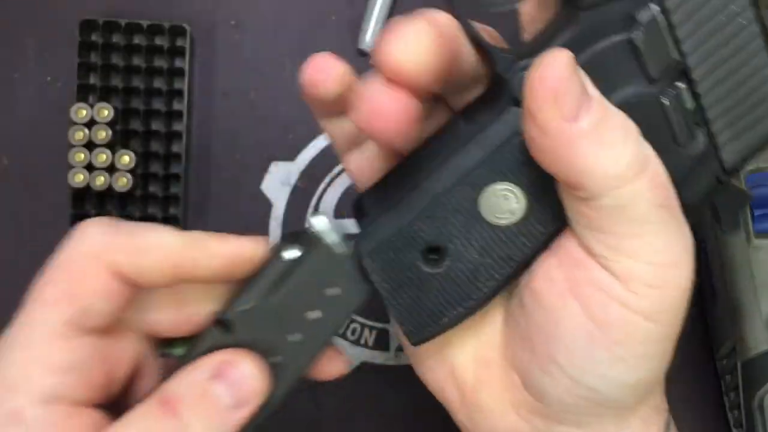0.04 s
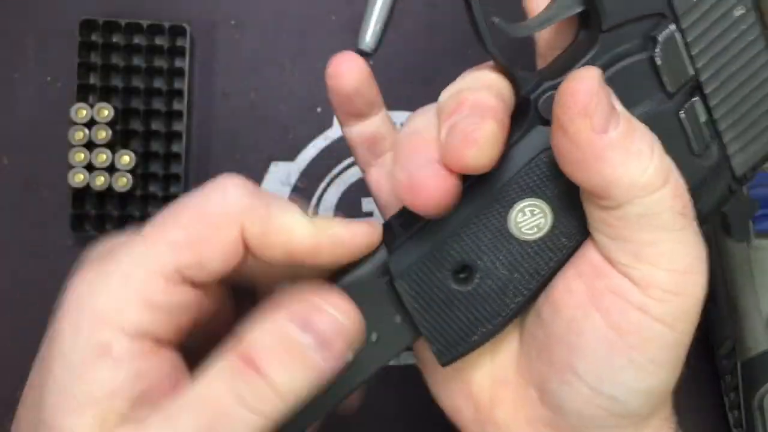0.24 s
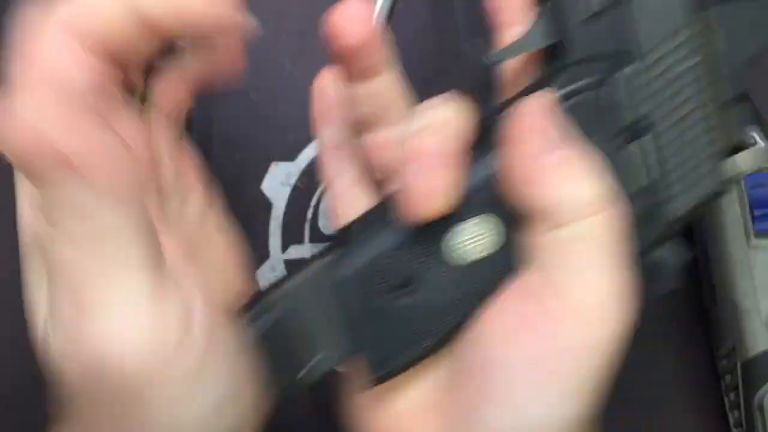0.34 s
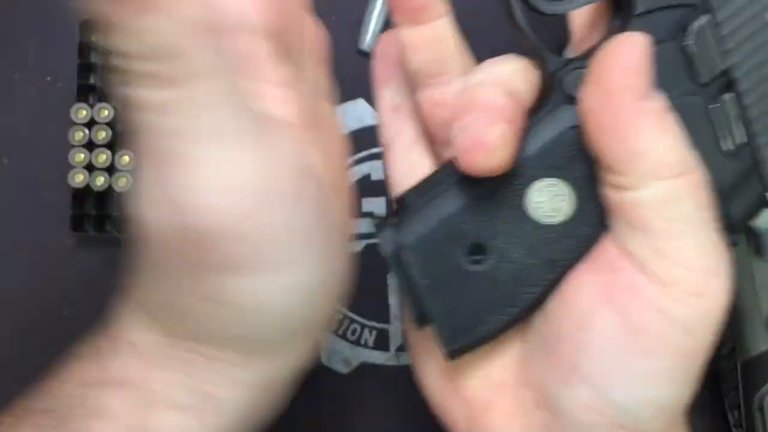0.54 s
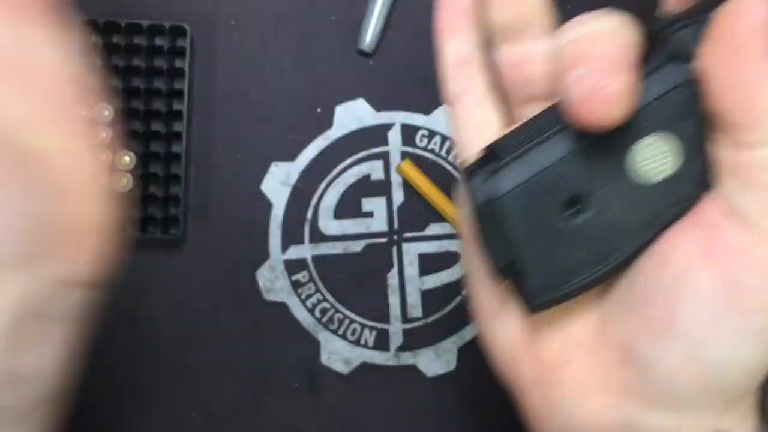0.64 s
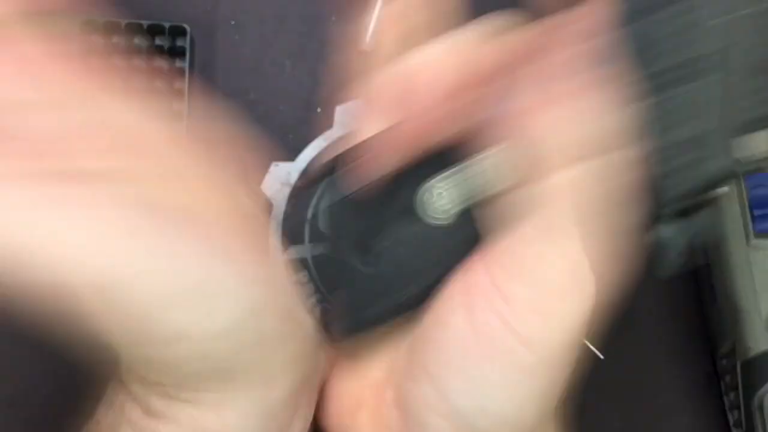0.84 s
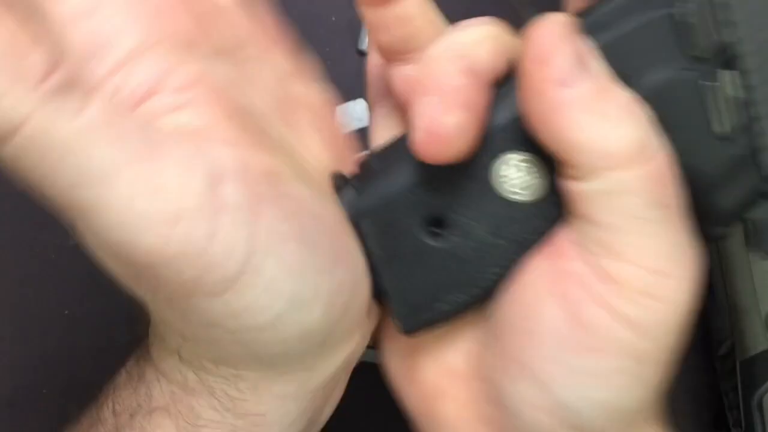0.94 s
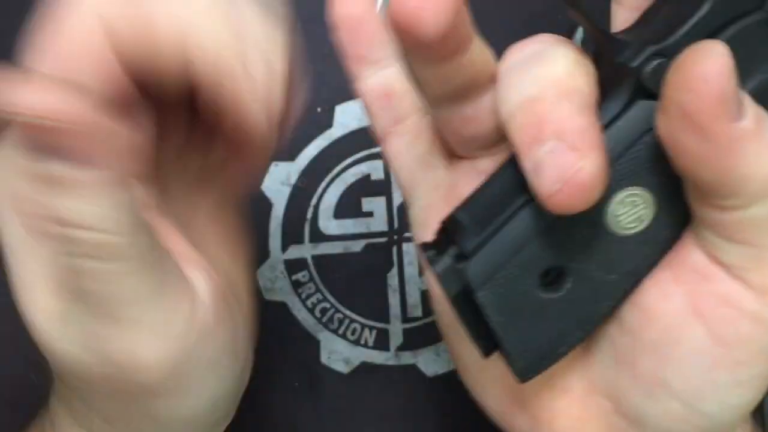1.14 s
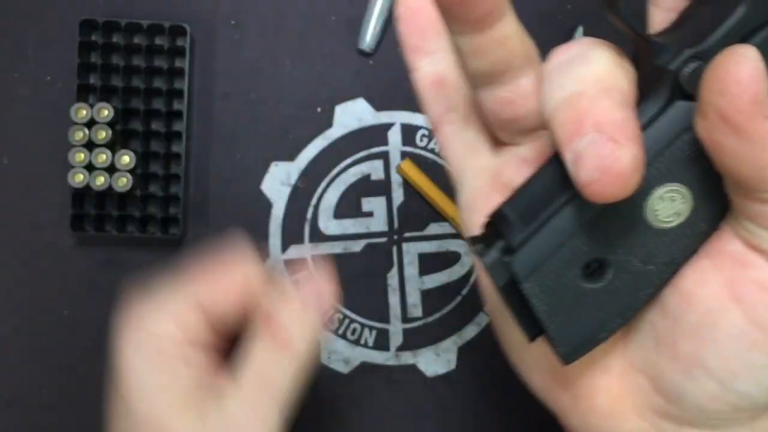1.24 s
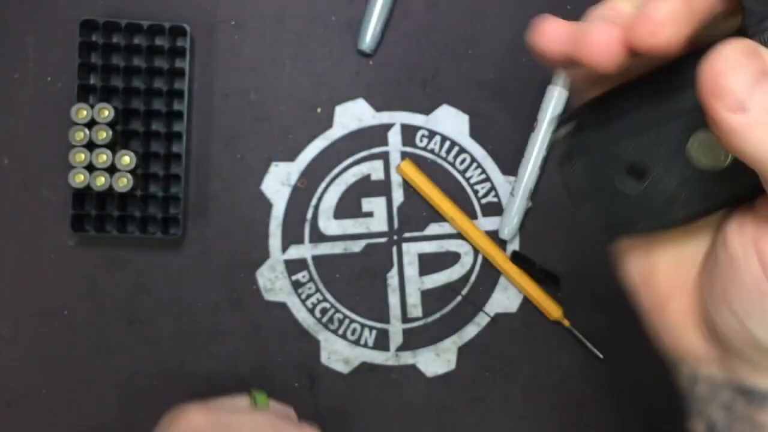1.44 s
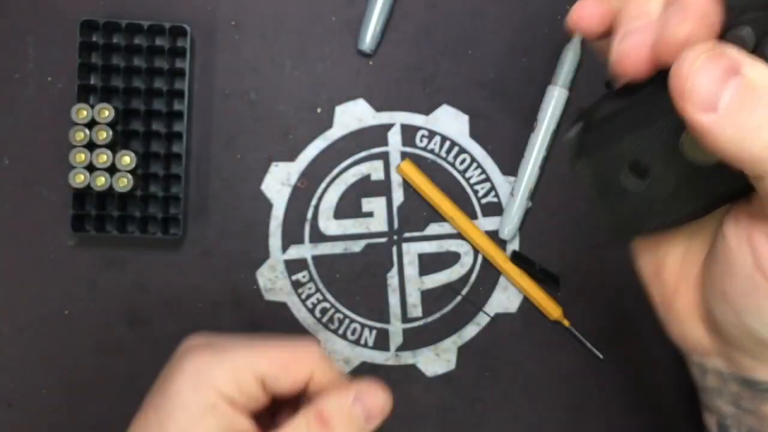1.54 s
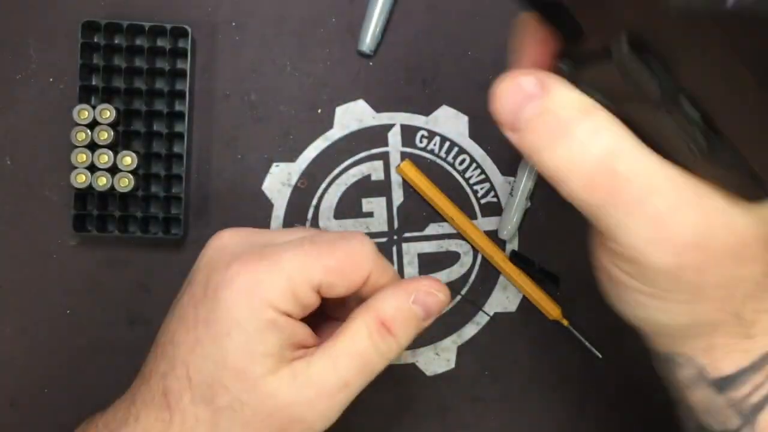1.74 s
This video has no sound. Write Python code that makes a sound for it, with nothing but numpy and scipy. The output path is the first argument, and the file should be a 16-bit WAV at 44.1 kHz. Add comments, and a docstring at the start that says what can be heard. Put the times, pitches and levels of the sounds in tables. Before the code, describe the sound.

A steel magazine clacks into a pistol grip at about 0.2 seconds, scrapes upward and locks at 0.5 seconds with a sharp click, palm thud and thin spring ping. Near 1 second a harder palm slap and metallic click briefly overload the close microphone. Soft workbench bumps and hand rubbing follow until 1.5 seconds, and one faint click comes at 1.8 seconds over quiet room tone.

```python
"""A loaded steel magazine is fed into a pistol, close to the microphone, above a workbench in a small room.
Over faint room tone it clacks against the mouth of the hollow grip, steel ringing, then scrapes up the
well, squeaks, and is driven home with a palm thud and a spring ping. A grip panel knocks softly.
The palm slaps the magazine once more, hard enough to overload the microphone, and it clicks back.
Afterwards the hands bump the bench softly and rub on grip and mat; one faint steel click comes last."""
import sys
import numpy as np
from scipy import signal
from scipy.fft import rfft, irfft
from scipy.io import wavfile

SR = 44100
rng = np.random.default_rng(int(sys.argv[2]) if len(sys.argv) > 2 else 0)


def transcribe(u):
    """Save the signal u as a 16-bit wav file named by the first command-line argument.

    u: samples, shape (n,) or (channels, n), limited to [-1, 1]; the rate is SR.
    q: integer samples, one column per channel.
    """
    v = np.clip(np.atleast_2d(u).T, -1, 1)
    q = np.round(v * 32767).astype(np.int16)
    wavfile.write(sys.argv[1], SR, q)


N = 79380

# hiss of the quiet room: (frequency [Hz], relative density [dB])
HISS_SPECTRUM = [(25, -12), (60, -3), (150, -4), (300, -8), (600, -18), (1200, -20), (3000, -22),
                 (6000, -26), (16000, -34)]
# steel meets steel: (time [s], level [dB], crush length [s], t60 [s], tilt [dB/octave],
# ring of the hollow grip [dB], low body [dB])
STEEL_CONTACTS = [(0.085, -56.5, 0.013, 0.17, 2.5, -21, 11.5), (0.225, -26, 0.0031, 0.022, 0, -21.5, -9),
                  (0.2389, -4.5, 0.0011, 0.024, -1.8, -7.5, -8.5),
                  (0.254, -30, 0.0074, 0.049, -1, 0.5, -4.5), (0.2917, -7.5, 0.00044, 0.011, -2, -3.5, -4),
                  (0.3101, -15, 0.0014, 0.019, -2.5, -11, 3), (0.3176, -17, 0.0022, 0.017, 0.5, -14, 4),
                  (0.3855, -30, 0.0053, 0.034, -3.5, -5.5, 9), (0.4086, -28, 0.0013, 0.045, 3, -12.5, -0.5),
                  (0.429, -18.5, .003, .016, 0.5, -11, 4), (0.441, -26.5, 0.0017, 0.022, -1, -6.5, 0.5),
                  (0.467, -15, 0.0014, .035, -0.5, -8.5, -4.5),
                  (0.4825, -10.5, 0.0051, 0.025, -2, -6.5, -1), (0.4866, -3.5, 0.0045, 0.018, 3, -18, -1.5),
                  (.4900, 3, 0.0045, 0.009, 0, -17, -1), (0.4963, -4.5, 0.0022, 0.027, 3, -12.5, 0.5),
                  (0.952, -39, 0.00084, .014, 2.5, -20.5, -4.5), (0.9697, -15, .001, 0.018, 6, -17, 3.5),
                  (0.9725, 1, 0.0013, 0.018, 1, -5.5, 7), (0.979, -0.5, 0.00088, 0.022, 1.1, -19.5, -4.5),
                  (1.0061, -8, 0.00069, 0.016, 1.5, -14.5, 9.5), (1.072, -31.5, 0.0016, 0.016, 4.5, -27, 0),
                  (1.7972, -29, 0.0036, 0.038, -4, -14, -6.5)]
# the crack of a contact: (frequency [Hz], relative density [dB])
CRACK_SPECTRUM = [(60, -35), (160, -26.5), (330, -12), (700, -18.5), (1100, 0), (2000, -0.5), (2800, 0.5),
                  (5500, -1.5), (7800, -8.5), (9200, -5.5), (10400, -17), (12500, -9), (16000, -22.5)]
# how far up a contact's low body reaches: (frequency [Hz], share [0-1])
BODY_REACH = [(650, 1), (1100, 0.047)]
# modes of frame and magazine: (frequency [Hz], level [dB], t60 [s])
STEEL_MODES = [(1322, -8, .07), (1490, -14, .05), (2150, -14, .06), (2347, -11, .08), (2630, -11, .08),
               (2862, -13, .09), (3250, -14, .07), (3462, -16, .07), (3557, -12, .06), (3970, -15, .05),
               (4078, -15, .08), (4526, -12, .08), (5222, -14, .09), (5355, -15, .05), (6200, -15, .03),
               (8930, -16, .04)]
# pitch of the hollow grip as the magazine goes in: (time [s], pitch [Hz])
WELL_PITCH = [(.24, 1130), (.3, 1030), (.455, 1000), (.49, 1116)]
# the room's answer against the close sound: (frequency [Hz], level [dB])
REVERB_LEVELS = [(150, -22), (350, -19), (600, -22.5), (1300, -22), (2600, -22.5), (4500, -21), (8500, -25),
                 (15000, -24.5)]
# how long the room rings: (frequency [Hz], t60 [s])
REVERB_DECAY = [(150, .23), (1300, .29), (2600, .38), (4500, .39), (8500, .32), (15000, .22)]
# force of the magazine sliding up the well: (time [s], level [dB])
SLIDE_FORCE = [(.24, -62.5), (.28, -44), (0.329, -34.5), (.36, -41.5), (.39, -33.5), (0.439, -36),
               (0.446, -25), (0.477, -24.5), (.486, -36.5)]
# steel scraping in the well: (frequency [Hz], relative density [dB])
SCRAPE_SPECTRUM = [(60, -37.5), (170, -23), (350, 0.5), (700, -5), (1000, 1), (3000, 5), (6000, -1),
                   (9000, -3), (10500, -15), (13000, -11), (15000, -11)]
# the palm drives the base plate: (time [s], level [dB])
PALM_STRIKES = [(0.4956, -8.5), (0.972, 4)]
# the spring of the catch: (time [s], level [dB], pitch [Hz], t60 [s])
SPRING_PINGS = [(.4958, -32, 9510, .28), (1.0064, -17, 4790, .04)]
# grip panels knock in the hand: (time [s], level [dB], tilt [dB/octave])
PANEL_KNOCKS = [(0.7772, -40, -1.5), (1.389, -42, -2.5)]
# modes of a grip panel: (frequency [Hz], level [dB], t60 [s])
PANEL_MODES = [(300, -9, .06), (478, -4, .09), (700, -7, .06), (895, -7, .05), (1125, -5, .05),
               (2470, -6, .07), (2600, -7, .08), (3178, 0, .035), (4380, -6, .03), (5930, -8, .03)]
# soft knocks that reach the bench: (time [s], level [dB], pitch [Hz])
BENCH_BUMPS = [(0.999, -27.5, 145.8), (1.155, -38, 133.3), (1.187, -40.5, 136.7), (1.223, -39, 107.8),
               (1.42, -22, 150.4), (1.478, -37.5, 82.8)]
# skin rubs on the grip and the mat: (peak time [s], level [dB], fade time [s], tilt [dB/octave])
SKIN_RUBS = [(1.405, -52, .027, -.5), (1.462, -51, .018, .5), (1.52, -53, .037, -2)]
# friction of skin: (frequency [Hz], relative density [dB])
SKIN_SPECTRUM = [(60, -6), (250, 8), (700, -6), (1700, 3), (4000, -2), (7000, -7), (15000, -15)]

WELL_T60_S = 0.036  # ring time of the hollow grip


def from_db(db):
    """Decibels as an amplitude ratio."""
    return 10 ** (np.asarray(db) / 20)


def unit_rms(x):
    """Scales a signal to rms 1."""
    return x / np.sqrt(np.mean(x ** 2) + 1e-20)


def since(start):
    """Seconds elapsed after a moment, zero before it."""
    return np.maximum(np.arange(N) / SR - start, 0)


def decay(t, t60):
    """An envelope that falls 60 dB in t60 seconds."""
    return np.exp(-np.log(1000) * t / t60)


def rise(t, attack_s):
    """An envelope that climbs from 0 towards 1."""
    return 1 - np.exp(-t / attack_s)


def at_hz(table, hz):
    """Reads a table on a log-frequency axis."""
    frequencies, values = np.transpose(table)
    return np.interp(np.log(np.maximum(hz, 1)), np.log(frequencies), values)


def coloured(noise, spectrum, tilt_db=0):
    """Gives a steady noise a spectrum, and a tilt per octave above 500 Hz; rms 1."""
    hz = np.arange(N // 2 + 1) * SR / N
    gain_db = at_hz(spectrum, hz) + tilt_db * np.log2(np.maximum(hz, 500))
    return unit_rms(irfft(rfft(noise) * from_db(gain_db), N))


def low_cut(x, hz):
    """Rolls the bass off at 12 dB per octave."""
    return signal.sosfilt(signal.butter(2, hz, "high", fs=SR, output="sos"), x)


def clicks(times, levels_db):
    """Single-sample kicks at the given moments."""
    out = np.zeros(N)
    np.add.at(out, (np.asarray(times) * SR).astype(int), from_db(levels_db))
    return out


def ring(drive, hz, t60):
    """One mode, which a unit click sets ringing at height 1; it passes no deep bass."""
    radius, angle = from_db(-60 / (t60 * SR)), 2 * np.pi * hz / SR
    return signal.lfilter([.5, 0, -.5], [1, -2 * radius * np.cos(angle), radius ** 2], drive + 1e-18)


def thud(start, start_hz, end_hz, sag_s, attack_s, t60):
    """A soft blow: a damped swing whose pitch sinks as the contact relaxes."""
    t = since(start)
    cycles = end_hz * t + (start_hz - end_hz) * sag_s * rise(t, sag_s)
    return rise(t, attack_s) * decay(t, t60) * np.sin(2 * np.pi * cycles)


def room_tone(hiss_db=-59.5, hum_db=-62, hum_hz=58.5):
    """The small room at rest: faint hiss and a low hum."""
    hiss = coloured(rng.standard_normal(N), HISS_SPECTRUM)
    hum = np.sin(2 * np.pi * hum_hz * since(0))
    return from_db(hiss_db) * hiss + from_db(hum_db) * hum


def steel_clacks():
    """Each contact is a brief crush of dense, fast-dying vibration, with no deep bass."""
    out = np.zeros(N)
    for start, db, crush_s, t60, tilt_db, _, body_db in STEEL_CONTACTS:
        spectrum = [(hz, crack_db + body_db * at_hz(BODY_REACH, hz)) for hz, crack_db in CRACK_SPECTRUM]
        envelope = rise(since(start), attack_s=0.000067) * decay(since(start + crush_s), t60)
        out += from_db(db) * envelope * coloured(rng.standard_normal(N), spectrum, tilt_db)
    return low_cut(out, hz=190)


def hollow_grip(drive, moment):
    """The hollow grip rings at the pitch it has at that moment of the magazine's travel."""
    return ring(drive, np.interp(moment, *np.transpose(WELL_PITCH)), WELL_T60_S)


def contact_ringing(steel_db=-11.5, scatter_db=1):
    """After each contact the steel and the hollow grip ring on; parts this small radiate little bass."""
    out = np.zeros(N)
    times, contact_db, *_, well_db, _ = np.transpose(STEEL_CONTACTS)
    for k, (hz, mode_db, t60) in enumerate(STEEL_MODES):
        strike_db = contact_db + steel_db + mode_db + scatter_db * rng.standard_normal(len(times))
        out += (-1) ** k * ring(clicks(times, strike_db), hz, t60)  # modes alternate in polarity
    for start, hollow_db in zip(times, contact_db + well_db):
        out += hollow_grip(clicks([start], [hollow_db]), start)
    return low_cut(out, hz=850)


def room_reverb(close, onset_s=.018):
    """The room answers with a diffuse tail that builds quickly and dies at its own rate per half octave."""
    t, hz = since(0), np.arange(N // 2 + 1) * SR / N
    white, tail = rfft(rng.standard_normal(N)), np.zeros(N)
    build_up = 1 - np.exp(-(t / onset_s) ** 2)
    edges_hz = np.geomspace(70, 18000, 17)
    for low, high in zip(edges_hz, edges_hz[1:]):
        centre = np.sqrt(low * high)
        band = irfft(white * (hz >= low) * (hz < high), N)
        envelope = build_up * decay(t, at_hz(REVERB_DECAY, centre))
        tail += from_db(at_hz(REVERB_LEVELS, centre)) * envelope / np.linalg.norm(envelope) * band
    return signal.fftconvolve(close, tail)[:N]


def magazine_scrape(slips_per_s=5000, spread_db=1, judder_db=4, judder_s=0.0025, hollow_db=-9.5):
    """Tiny uneven slips of the magazine wall hiss and stir the hollow grip; the push judders."""
    times, force_db = np.transpose(SLIDE_FORCE)
    t, knots = since(0), np.arange(0, N / SR, judder_s)
    sizes = from_db(spread_db * np.minimum(rng.exponential(1, N), 4))
    signs = rng.choice([-1, 1], N)
    slips = sizes * signs * (rng.random(N) < slips_per_s / SR)
    judder = np.interp(t, knots, rng.standard_normal(N)[:len(knots)])
    push_db = np.interp(t, times, force_db, left=-np.inf, right=-np.inf)
    force = from_db(push_db + judder_db * judder)
    hollow = unit_rms(hollow_grip(slips, times.mean()))
    return force * (coloured(slips, SCRAPE_SPECTRUM) + from_db(hollow_db) * hollow)


def magazine_squeak(peak_s=.459, width_s=.005, hz=8000, rise_hz_per_s=70000, db=-30):
    """Steel sticks and slips for a moment in a thin, rising chirp."""
    t = since(0) - peak_s
    cycles = hz * t + rise_hz_per_s * t ** 2 / 2
    return from_db(db) * np.exp(-(t / width_s) ** 2) * np.sin(2 * np.pi * cycles)


def palm_blows(slap_db=-14.5):
    """The heel of the hand lands with a short, falling thud; air trapped under it gives a hollow slap."""
    out = np.zeros(N)
    for start, db in PALM_STRIKES:
        out += from_db(db) * thud(start, start_hz=308, end_hz=50.4, sag_s=.0055, attack_s=.0051, t60=.062)
        out += ring(clicks([start], [db + slap_db]), hz=358, t60=0.03)
    return out


def catch_spring(blur_s=.016):
    """The spring buzzes against its seat as the catch snaps in: a thin, blurred ping."""
    out = np.zeros(N)
    for start, db, hz, t60 in SPRING_PINGS:
        t = since(start)
        buzz = unit_rms(ring(rng.standard_normal(N), hz, blur_s))
        out += from_db(db) * (t > 0) * decay(t, t60) * buzz
    return out


def grip_panels(crack_db=5):
    """A grip panel shifts under the fingers: a soft crack and a hollow knock."""
    out = np.zeros(N)
    for start, db, tilt_db in PANEL_KNOCKS:
        kick, t = clicks([start], [0]), since(start)
        knock = sum((-1) ** k * from_db(mode_db) * ring(kick, hz, t60)
                    for k, (hz, mode_db, t60) in enumerate(PANEL_MODES))
        noise = coloured(rng.standard_normal(N), CRACK_SPECTRUM, tilt_db)
        crack = from_db(crack_db) * decay(t, t60=.05) * noise
        out += from_db(db) * rise(t, attack_s=.001) * (knock + crack)
    return out


def bench_bumps(start_ratio=1.6, overtone_ratio=1.8, overtone_db=-5.5):
    """Soft knocks set the bench top booming, with one short overtone."""
    out = np.zeros(N)
    for start, db, hz in BENCH_BUMPS:
        out += from_db(db) * thud(start, hz * start_ratio, hz, sag_s=0.0036, attack_s=0.00067, t60=0.21)
        out += ring(clicks([start], [db + overtone_db]), hz * overtone_ratio, t60=0.06)
    return out


def hand_rubs():
    """The hands shift in short swells of friction that fade softly."""
    out = np.zeros(N)
    for peak_s, db, fade_s, tilt_db in SKIN_RUBS:
        swell = from_db(db) / np.cosh((since(0) - peak_s) / fade_s)
        out += swell * coloured(rng.standard_normal(N), SKIN_SPECTRUM, tilt_db)
    return out


def scene():
    """Pistol and hands close to one microphone, with the small room behind them."""
    pistol = steel_clacks() + contact_ringing() + catch_spring() + grip_panels()
    magazine = magazine_scrape() + magazine_squeak()
    hands = palm_blows() + bench_bumps() + hand_rubs()
    close = pistol + magazine + hands
    return (close + room_reverb(close) + room_tone())[None]


def record(dry):
    """The hard blows overload the microphone, which flattens their peaks; the top is cut steeply."""
    ceiling, hardness, cutoff_hz = 1.0, 6, 16000
    flattened = dry / (1 + (dry / ceiling) ** hardness) ** (1 / hardness)
    return signal.sosfilt(signal.ellip(10, .1, 70, cutoff_hz, fs=SR, output="sos"), flattened)


dry = scene()
out = record(dry)
transcribe(out)
```